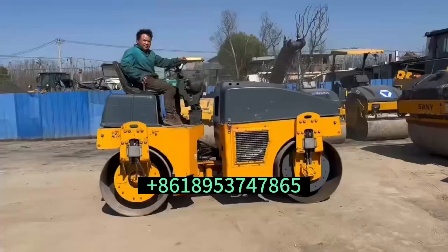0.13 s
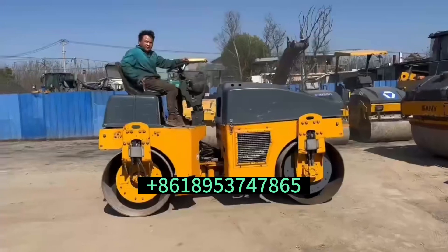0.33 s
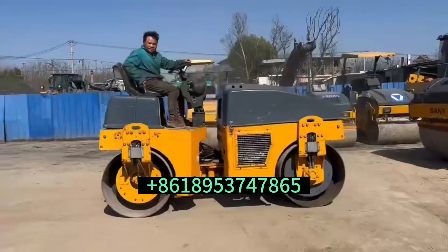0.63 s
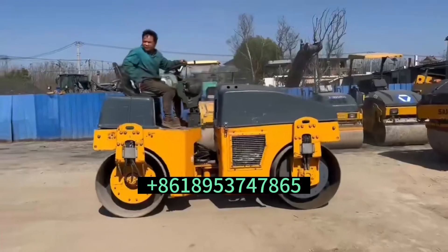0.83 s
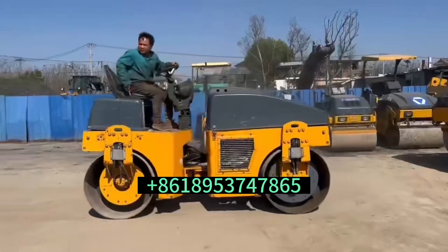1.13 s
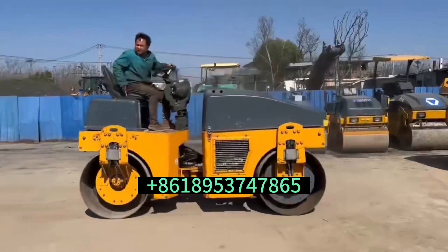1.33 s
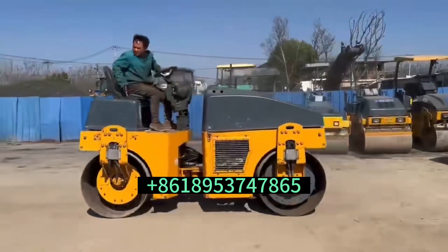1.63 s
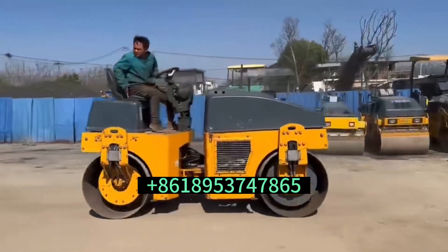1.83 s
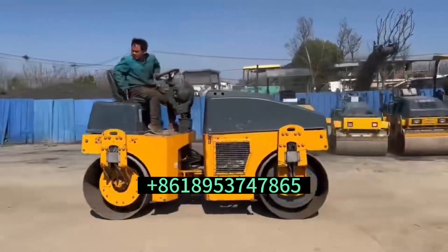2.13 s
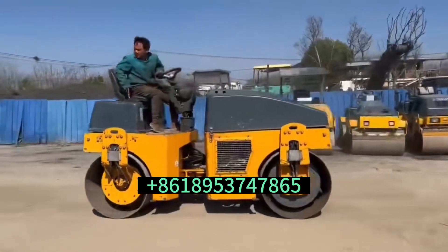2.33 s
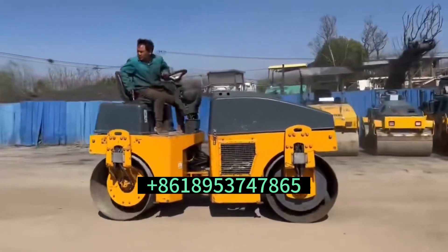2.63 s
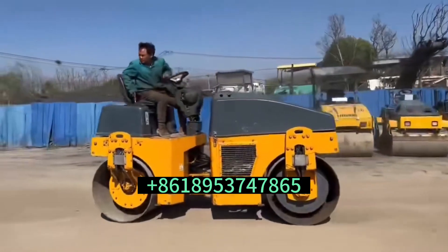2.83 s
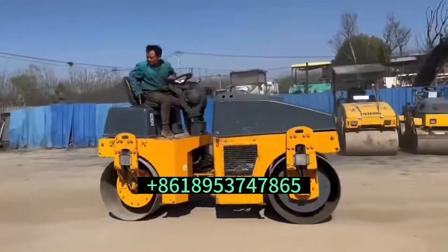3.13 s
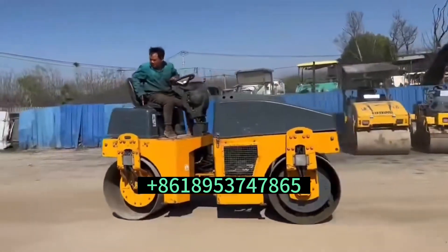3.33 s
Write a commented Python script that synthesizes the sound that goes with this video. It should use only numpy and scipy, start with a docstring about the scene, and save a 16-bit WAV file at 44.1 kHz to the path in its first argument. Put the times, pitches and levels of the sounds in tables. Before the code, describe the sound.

A small road roller's diesel engine drones low and knocks steadily in an open yard.

```python
"""An open yard, where a small tandem road roller drives slowly past, a few metres away.
Its four-cylinder diesel drones in low tones, knocks at every firing and labours briefly under load.
Short bursts and taps of noise, some played through resonances, make the knocking and metallic ringing.
Shaped noise makes the fan's rush, the rumble of the steel drums and the grit they sometimes crush.
A thin whine comes and goes as the engine's side grille turns to the listener."""
import sys
import numpy as np
from scipy.fft import rfft, irfft, next_fast_len
from scipy.io import wavfile
from scipy.ndimage import map_coordinates

SR = 44100
rng = np.random.default_rng(int(sys.argv[2]) if len(sys.argv) > 2 else 0)


def master(y):
    """Save y as 16-bit WAV."""
    cut = np.clip(np.atleast_2d(y).T, -1, 1)
    pcm = np.round(cut * 32767)  # scale
    wavfile.write(sys.argv[1], SR, pcm.astype(np.int16))


N = 153909  # samples in the scene

# Engine pace. Each row: time in seconds, firings per second.
FIRING_RATE = [(0, 58.5), (.3, 60.13), (.65, 57.1), (.95, 57.32), (1.25, 59.85), (1.75, 58.68), (2.1, 59.6),
               (2.8, 59.53), (3.49, 59.06)]
# How hard the engine works; fan, exhaust, knocking, valves, head and frame each follow it in their own measure.
# Each row: time in seconds, load in dB.
LOAD = [(.1, -1), (.38, -1), (.58, 2), (.8, 3), (1.08, 1.2), (1.3, -1), (1.7, 1.5), (2.3, -0.5),
        (3.1, -0.5), (3.49, -0.5)]
# How the side grille faces the listener. Each row: time in seconds, facing from 0 (slanted) to 1 (square on).
FACING = [(1.2, 0.087), (1.9, 0.64), (2.75, 1), (3.49, 0.087)]
# Steel drums on the ground. Each row: time in seconds, rumble level in dB, boom level of the drum shells in dB.
ROLLING = [(.1, -33, -50), (.25, -25.5, -41), (1.2, -25.5, -43.5), (1.75, -25.5, -23.5),
           (2.2, -25.5, -30.5), (2.5, -27.5, -32), (2.9, -25.5, -44), (3.49, -22, -46)]
# Grit cracking under a drum. Each row: time in seconds, level in dB, decay in seconds.
GRIT = [(.386, -35, .005), (.772, -32, .003), (.784, -24, .004), (1.723, -28, .004), (1.729, -32, .003),
        (1.738, -32, .003), (1.876, -32, .006), (2.19, -38, .004)]
# Colours of the noises. Each row: frequency in Hz, relative level in dB.
RUMBLE_COLOUR = [(15, -52), (30, -16), (45, -2.5), (70, 4.5), (95, -3.5), (140, -4.5), (220, -12),
                 (400, -18.5), (1500, -88)]
GRIT_COLOUR = [(600, 0), (3000, 8), (5500, 5), (8000, 0), (11000, 4), (13000, -1), (14000, -14)]
FAN_COLOUR = [(100, -11), (250, -5), (450, 1.5), (750, 0), (1120, -11.5), (1400, -3), (1570, -12.5),
              (2100, -5.5), (3300, -9), (3900, -11.5), (5300, -15.5), (6000, -21.5), (7600, -24),
              (9100, -72), (10200, -29), (11800, -26), (14000, -46)]
PUFF_COLOUR = [(50, -4), (110, -7), (180, 4), (260, 0.5), (420, -9), (700, -20.5), (1200, -15.5),
               (4000, -40.5)]
KNOCK_COLOUR = [(300, -4), (800, -0.5), (1150, -1.5), (1570, 1), (1900, 5.5), (2500, -1.9), (3450, 0),
                (3750, -8), (5400, -7), (5900, -14.5), (7500, -15.5), (9100, -50), (10200, -14),
                (11800, -20), (14000, -46)]
# A narrow whine that beams out of the side grille. Each row: time in seconds, level in dB.
WHINE_LEVEL = [(1.3, -58), (1.75, -44), (2.2, -41), (2.72, -36.5), (3.1, -40), (3.49, -50)]
# Main exhaust tones. Each row: time in seconds, then levels in dB of the firing tone, 2nd and 3rd harmonics.
DRONE = [(.1, -30, -38, -36), (.25, -25, -33, -33), (.45, -24.5, -32, -29), (.58, -24, -23, -26),
         (.82, -24, -21, -25.5), (1.05, -24, -24, -27), (1.25, -23, -32, -26.5), (1.55, -25, -35, -31),
         (1.8, -27, -35, -33), (2.15, -27, -35, -31), (2.45, -28, -38, -36), (2.68, -24, -36, -37),
         (2.95, -26, -39, -35), (3.18, -28, -39, -34), (3.4, -21.5, -33, -32), (3.49, -23, -34, -33)]
# Weaker exhaust tones. Each row: multiple of the firing rate, level in dB, dB gained per dB of load.
OVERTONES = [(1.25, -40, 0), (2.25, -42.5, 0), (3.25, -42, .6), (4, -43, 0), (4.25, -39.5, 1.9),
             (5.75, -43, 0), (6, -39, .5)]
# Cylinders in firing order. Each row: relative levels in dB of knock, cover ring, head ring and exhaust puff.
CYLINDERS = [(0, 0, 0, -1), (-1, -13, -5, -1.5), (1, -3, 2.5, 1.5), (0, 1, -1, -1.5)]
# Resonances of the engine cover, the block and frame, and the cylinder head.
# Each row: frequency in Hz, width in Hz, relative level in dB seen at a slant, relative level in dB seen square on.
COVER_MODES = [(1705, 50, 1, 6), (1785, 65, 2, 0), (2017, 50, -1, -6)]
FRAME_MODES = [(352.7, 31, 2.5, 5), (524, 31, 1, 5.5), (693, 13, 2.5, -3), (765, 34, 2.5, -5),
               (829, 28, -6, 2.5), (979, 29, 2.5, -7.5), (1348, 28, -4, -16)]
HEAD_MODES = [(2566, 43, -13, 12), (2877, 55, 6, 6), (3120, 20, 0, 14), (3252, 57, 9, -2),
              (3414, 28, 9, 5.5), (4640, 59, -7, -6)]
# Ring of the engine cover. Each row: time in seconds, level in dB of its tapped part.
COVER_LEVEL = [(.1, -34.5), (.6, -32), (1.3, -37), (1.8, -32.5), (2.8, -32), (3.49, -35.5)]

FIRST_FIRING_S, EXHAUST_LAG_S = .0029, 0.006365
DRONE_WAVER_DB, DRONE_WAVER_RAD = 1.1, 0.2  # the phase waver grows with the multiple of the firing rate
WHINE_HZ, WHINE_WAVER_RAD = 1714, .5
BOOM_HZ, BOOM_WIDTH_HZ = 87.7, 20
GRIT_ATTACK_S = .0004
DIP_HZ, DIP_WIDTH_HZ, DIP_DEPTH = 1570, 85, 0.8  # depth: share removed when square on
START_S, BASS_RISE_S, BASS_EDGE_HZ, TOP_HZ = .082, 0.064, 195, 14100


def amp(db):
    """Turn decibels into a gain."""
    return 10 ** (np.asarray(db) / 20)


def unit(x):
    """Scale to an average (rms) strength of 1."""
    return x / np.sqrt(np.mean(x ** 2) + 1e-20)


def curves(rows):
    """Draw straight lines between a table's rows: one curve for each column after the time."""
    s, *columns = np.transpose(rows)
    return [np.interp(np.arange(N) / SR, s, column) for column in columns]


def wobble(rate):
    """A smooth random curve through rate random points a second."""
    points = rng.standard_normal(N // 8)
    return map_coordinates(points, [np.arange(N) * rate / SR + 4], order=3, mode="wrap")


def filtered(x, response):
    """Multiply the spectrum of x by a response that depends on frequency."""
    size = next_fast_len(N + SR // 2)  # spare room keeps the end from wrapping onto the start
    hz = np.fft.rfftfreq(size, 1 / SR)
    return irfft(rfft(x, size) * response(hz), size)[:N]


def noise(colour):
    """Noise of rms 1, with its levels joined up along a logarithmic frequency scale."""
    f, db = np.transpose(colour)
    response = lambda hz: amp(np.interp(np.log(hz + 1), np.log(f + 1), db))
    return unit(filtered(rng.standard_normal(N), response))


def ring(x, modes):
    """Play x through a body's resonances, whose balance shifts as the roller passes."""
    facing = np.clip(curves(FACING)[0], 0, 1)
    total = np.zeros(N)
    for centre, width, slant_db, square_db in modes:
        def response(f):
            resonance = centre * width / (centre ** 2 - f ** 2 + 1j * f * width)
            low_cut = 1j * f / (centre + 1j * f)
            return resonance * low_cut
        total += amp(slant_db + (square_db - slant_db) * facing) * filtered(x, response)
    return unit(total)


def bursts(firings, cylinder_db, lag_s, attack_s, decay_s, scatter_db, jitter_s):
    """An envelope of rms 1 with one burst per firing, sized by cylinder; overlapping bursts add as power."""
    power, t = np.zeros(N), np.arange(N) / SR
    starts = np.interp(np.arange(int(firings[-1]) + 1), firings, t) + lag_s
    chances = rng.standard_normal((len(starts), 2))
    for k, (start, (size, slip)) in enumerate(zip(starts, chances)):
        # only the stretch around this burst is worked out
        part = slice(max(int(start * SR) - SR // 100, 0), int(start * SR) + SR // 12)
        age = np.maximum(t[part] - start - jitter_s * slip, 0)
        level = amp(cylinder_db[k % len(cylinder_db)] + scatter_db * size)
        burst = level * (1 - np.exp(-age / attack_s)) * np.exp(-age / decay_s)
        power[part] += burst ** 2
    return unit(np.sqrt(power))


def taps(firings, cylinder_db, lag_s, scatter_db, jitter_s):
    """One single-sample tap per firing, sized by cylinder, with a little chance in size and timing."""
    k = np.arange(int(firings[-1]) + 1)
    size, slip = rng.standard_normal((len(k), 2)).T
    s = np.interp(k, firings, np.arange(N) / SR) + lag_s + jitter_s * slip
    position = np.abs(s * SR).astype(int)  # a time before zero is mirrored to after it
    level = amp(cylinder_db[k % len(cylinder_db)] + scatter_db * size)
    return np.bincount(position, level, N)[:N]


def fan(load_db):
    """Moving cooling air makes a broad rush, gently wavering and a little louder under load."""
    return amp(-28.5 + 0.27 * load_db + 1.78 * wobble(14)) * noise(FAN_COLOUR)


def drums():
    """Steel drums rumble and boom over packed earth and crack bits of grit, each with a sudden, short snap."""
    t = np.arange(N) / SR
    rumble_db, boom_db = curves(ROLLING)
    rumble = amp(rumble_db) * noise(RUMBLE_COLOUR)

    boom_band = lambda hz: np.exp(-((hz - BOOM_HZ) / BOOM_WIDTH_HZ) ** 2)
    boom = amp(boom_db) * unit(filtered(rng.standard_normal(N), boom_band))

    snaps = np.zeros(N)
    for start, db, decay in GRIT:
        attack = np.clip((t - start) / GRIT_ATTACK_S, 0, 1)
        snaps += amp(db) * attack * np.exp(-np.abs(t - start) / decay)
    crackle = unit(amp(1.4 * np.tanh(wobble(720))) * noise(GRIT_COLOUR))
    return rumble + boom + snaps * crackle


def whine():
    """A thin, slightly unsteady tone, clearest while the grille faces the listener."""
    level_db, = curves(WHINE_LEVEL)
    phase = 2 * np.pi * WHINE_HZ * np.arange(N) / SR + WHINE_WAVER_RAD * wobble(25)
    return amp(level_db + 1.0 * wobble(9.9)) * unit(np.sin(phase))


def exhaust(firings, load_db):
    """Low wavering tones locked to the firings (pressure builds slowly, drops fast), and a gas puff with each."""
    t = np.arange(N) / SR
    cycle = np.interp(t - EXHAUST_LAG_S, t, firings)
    tones = list(enumerate(curves(DRONE), 1))
    tones += [(multiple, db + gain * load_db) for multiple, db, gain in OVERTONES]
    drone = np.zeros(N)
    for multiple, db in tones:
        level = amp(db + DRONE_WAVER_DB * wobble(15)) * np.sqrt(2)  # sqrt(2) turns rms into peak
        phase = 2 * np.pi * multiple * cycle + DRONE_WAVER_RAD * multiple * wobble(6)
        drone -= level * np.sin(phase)

    puff_db = np.transpose(CYLINDERS)[3]
    puffs = bursts(firings, puff_db, lag_s=0.0044, attack_s=0.0017, decay_s=0.007,
                   scatter_db=2.24, jitter_s=.0012)
    return drone + amp(-27.5 + 0.34 * load_db) * puffs * noise(PUFF_COLOUR)


def diesel_knock(firings, load_db):
    """Combustion cracks through the block and rings the head; piston slap rings the cover; valves tick between."""
    knock_db, slap_db, crack_db, _ = np.transpose(CYLINDERS)
    knocks = bursts(firings, knock_db, lag_s=-0.0028, attack_s=0.0026, decay_s=0.0075,
                    scatter_db=1.5, jitter_s=0.0007)
    rough_knocks = unit(knocks * amp(1.1 * wobble(500)))
    knocking = amp(-34.0 + 2.03 * load_db) * rough_knocks * noise(KNOCK_COLOUR)

    # two valve ticks per firing
    valves = bursts(2 * firings, [0], lag_s=0.00304, attack_s=.0003, decay_s=0.0024,
                    scatter_db=2, jitter_s=.0014)
    ticking = amp(-42.0 + 1.6 * load_db) * valves * noise(KNOCK_COLOUR)

    slaps = taps(firings, slap_db, lag_s=-.0038, scatter_db=2.0, jitter_s=0.00027)
    cover_db, = curves(COVER_LEVEL)
    steady_ring = amp(-6.5) * ring(rng.standard_normal(N), COVER_MODES)
    cover = amp(cover_db) * (ring(slaps, COVER_MODES) + steady_ring)

    cracks = taps(firings, crack_db, lag_s=-0.0009, scatter_db=0.5, jitter_s=0.00061)
    head = amp(-36.2 + 2.0 * load_db) * ring(cracks, HEAD_MODES)

    frame = amp(-31.5 + 0.25 * load_db) * ring(knocks * rng.standard_normal(N), FRAME_MODES)
    return knocking + ticking + cover + head + frame


def scene():
    """The crankshaft paces exhaust and knock; a narrow midrange dip deepens as the roller comes abreast."""
    firing_rate, = curves(FIRING_RATE)
    load_db, = curves(LOAD)
    facing, = curves(FACING)
    firings = np.cumsum(firing_rate) / SR - FIRST_FIRING_S * firing_rate[0]  # running count of firings
    background = fan(load_db) + drums() + whine()
    engine = exhaust(firings, load_db) + diesel_knock(firings, load_db)
    roller = background + engine

    dip_band = filtered(roller, lambda hz: np.exp(-((hz - DIP_HZ) / DIP_WIDTH_HZ) ** 2))
    return (roller - np.clip(DIP_DEPTH * facing, 0, 1) * dip_band)[None]


def record(dry):
    """Sound starts after a moment of silence, its bass rising more slowly; the top of the treble is cut off."""
    age = np.arange(N) / SR - START_S
    bass = filtered(dry[0], lambda hz: 1 / (1 + (hz / BASS_EDGE_HZ) ** 4))
    missing_bass = bass * np.clip(1 - age / BASS_RISE_S, 0, 1)
    fade_in = np.clip(age / .003, 0, 1)  # 3 ms
    return filtered((dry[0] - missing_bass) * fade_in, lambda hz: hz < TOP_HZ)[None]


dry = scene()
out = record(dry)
master(out)
```